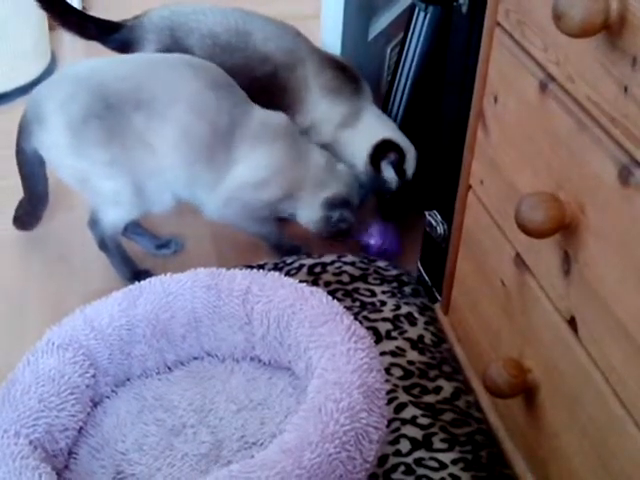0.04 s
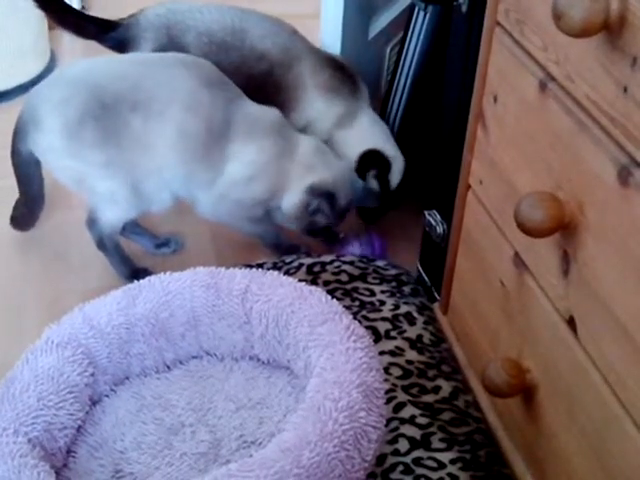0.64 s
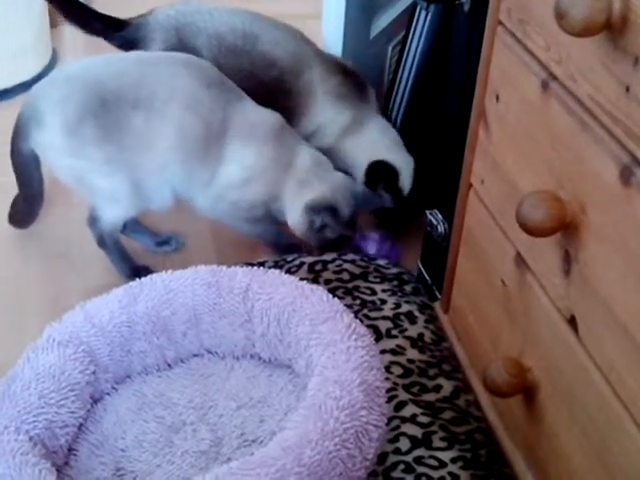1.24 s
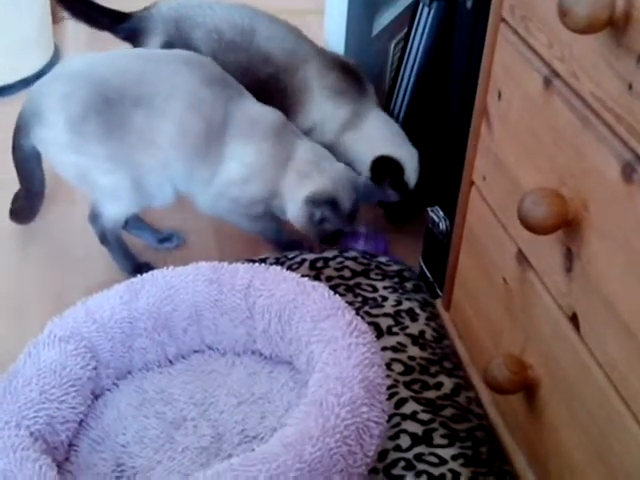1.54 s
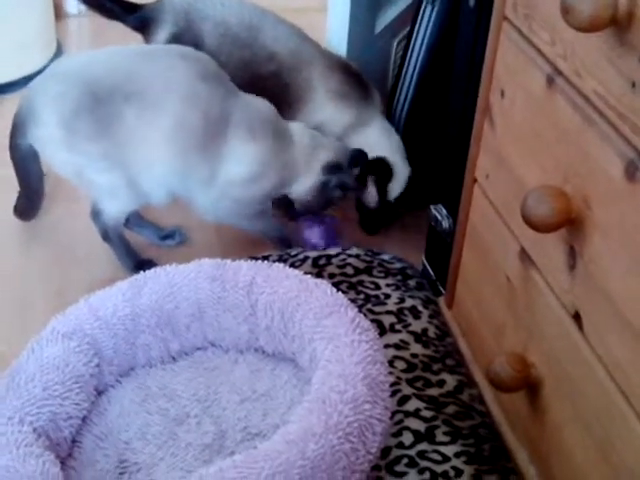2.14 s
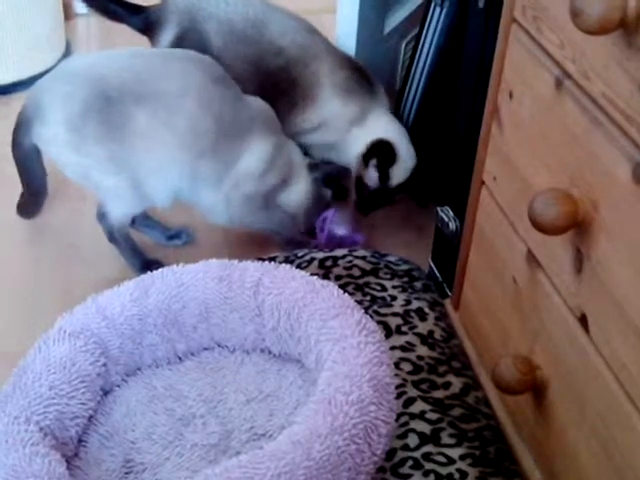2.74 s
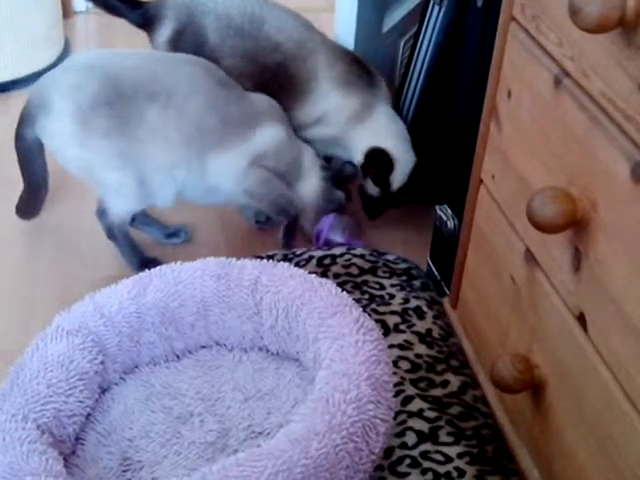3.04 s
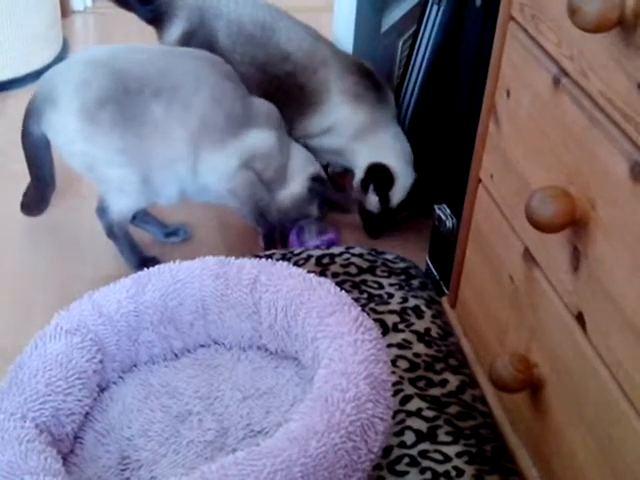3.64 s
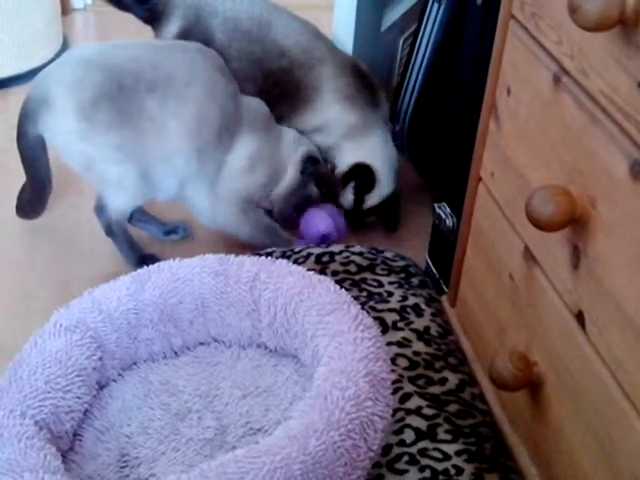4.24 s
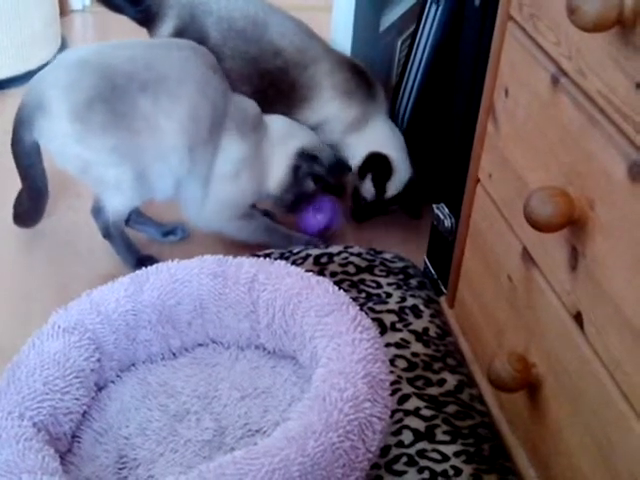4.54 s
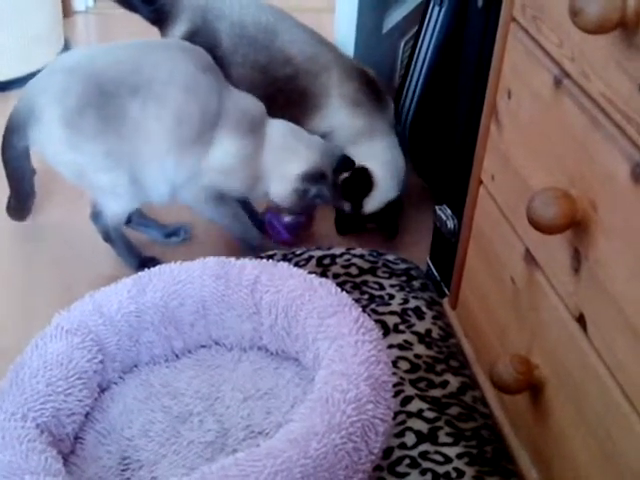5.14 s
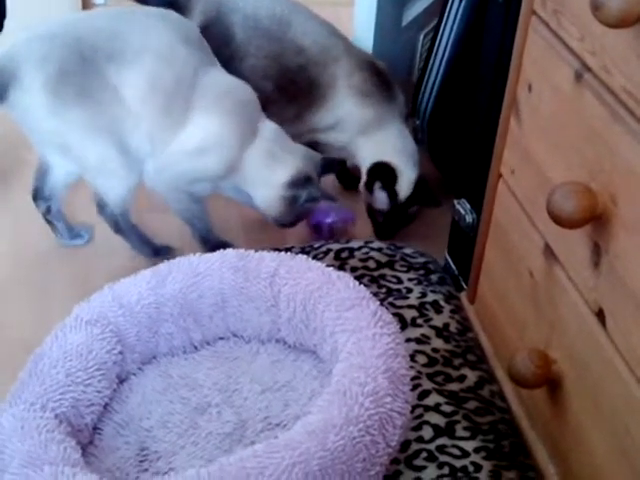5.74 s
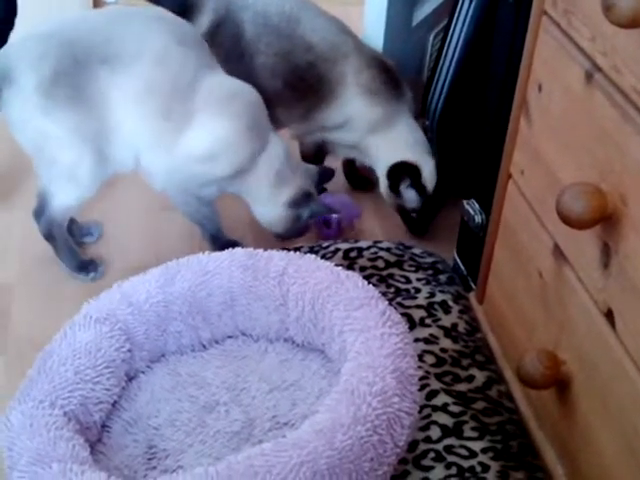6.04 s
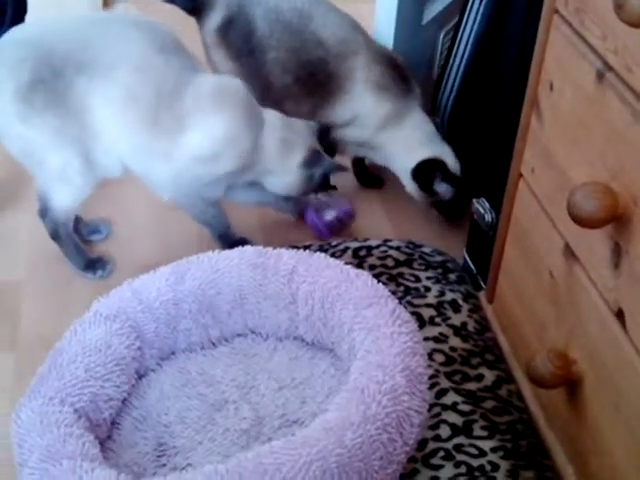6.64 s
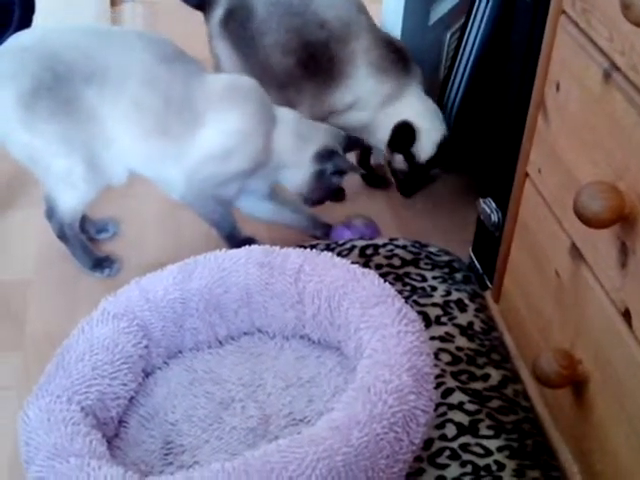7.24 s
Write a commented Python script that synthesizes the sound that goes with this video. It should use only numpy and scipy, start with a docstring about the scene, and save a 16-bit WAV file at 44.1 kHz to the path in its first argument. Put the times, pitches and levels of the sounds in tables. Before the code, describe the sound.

Two cats paw a hollow plastic treat ball over a wooden floor in a small, quiet room. The ball is close and slightly left. From about 0.3 seconds, dry food clicks sharply against the shell and slides inside in short rattles, bunching at 1.5 seconds and again, louder, at 2.3. The ball knocks lightly and rumbles briefly on the boards, with dull thuds near 0.9 and 2 seconds. From 2.5 to 4 seconds there is little but faint high ticks and soft shuffling. Clicks return at 4 seconds and build into a busy rattling cluster between 4.5 and 5.1, with one more clack at 5.5. After another lull, a last flurry runs from 6.8 to 7.5 seconds, with the loudest crack at about 7.2 and a soft bump on the floor. A faint low hum and soft room hush continue throughout.

```python
"""Sharp plastic clicks and a dry rattle in a quiet room: two cats paw a hollow treat ball over a wooden floor.
Dry food snaps against the shell, pings its wall and slides about inside as the ball tips.
The ball knocks as it bumps into things and rumbles on the boards, where paws land with dull thuds.
Faint high ticks, a low hum and the hush of the small furnished room lie underneath."""
import sys
import numpy as np
from scipy import signal
from scipy.fft import rfft, irfft, next_fast_len
from scipy.io import wavfile
from scipy.ndimage import map_coordinates

SR = 44100
rng = np.random.default_rng(int(sys.argv[2]) if len(sys.argv) > 2 else 0)


def waveform_to_disk(signal):
    """Save audio, clipped to [-1, 1], as 16-bit WAV at the path in sys.argv[1]."""
    frames = np.transpose(np.atleast_2d(signal))
    scaled = np.clip(frames, -1, 1) * 32767
    samples = np.round(scaled).astype(np.int16)
    wavfile.write(sys.argv[1], SR, samples)


N = 329868


def amp(db):
    """Decibels to gain."""
    return 10 ** (np.asarray(db) / 20)


def unit(x):
    """Scale to rms 1."""
    return x / np.sqrt(np.mean(x ** 2) + 1e-20)


def at_level(x, db, length):
    """Give x the energy of a sound at db that lasts length seconds."""
    return x * amp(db) * np.sqrt(length * SR / (np.sum(x ** 2) + 1e-20))


def curve(points, hz):
    """Read (Hz, value) breakpoints on a log frequency axis."""
    freqs, values = np.transpose(points)
    return np.interp(np.log(hz + 1), np.log(freqs), values)


def wobble(rate):
    """Smooth random modulation, rate knots a second."""
    return map_coordinates(rng.standard_normal(int(N * rate / SR) + 4), [np.arange(N) * rate / SR])


def filtered(x, response):
    """EQ x with the gain response(Hz)."""
    n = x.shape[-1]
    size = next_fast_len(n + SR // 4)
    return irfft(rfft(x, size) * response(np.fft.rfftfreq(size, 1 / SR)), size)[..., :n]


def impulse(eq_db, size=1024):
    """A minimum-phase transient with the spectrum eq_db(Hz)."""
    cepstrum = irfft(np.log(amp(eq_db(np.fft.rfftfreq(size, 1 / SR)))))
    cepstrum[1:size // 2] *= 2
    cepstrum[size // 2 + 1:] = 0
    return irfft(np.exp(rfft(cepstrum)))


def patter(length, rate, scatter_db, count=96):
    """Up to count irregular contacts within length seconds, about rate a second."""
    gaps = rng.uniform(.3, 1.7, count)
    hits = amp(scatter_db * rng.standard_normal(count)) * rng.choice([-1, 1], count)
    times = (np.cumsum(gaps) - gaps[0]) / rate
    inside = times <= length
    return np.bincount((times[inside] * SR).astype(int), hits[inside])


def add(out, start, x):
    """Mix stereo x into out at start seconds."""
    i = max(round(start * SR), 0)
    out[:, i:i + x.shape[1]] += x[:, :max(N - i, 0)]


def pan(db):
    """Stereo gains of mean power 1, the left db above the right."""
    return unit(amp([[db / 2], [-db / 2]]))


def in_room(x, pan_db, wet_db, wet_pan_db, mono_share=0, t60=0.25):
    """The direct sound plus a short tail of reflections that arrive in uneven clumps."""
    t = np.arange(SR // 4) / SR
    knots = np.arange(300) / 1000
    clumps = amp(3.7 * np.array([np.interp(t, knots, rng.standard_normal(300)) for _ in range(3)]))
    noise = rng.standard_normal((3, len(t))) * clumps * amp(-60 * t / t60) * (1 - np.exp(-t / 0.0013))
    tail = np.sqrt(1 - mono_share) * noise[:2] + np.sqrt(mono_share) * noise[2]
    wet = signal.fftconvolve(x[None], tail, axes=1)
    wet *= np.sqrt(np.sum(x ** 2) / np.sum(wet ** 2, axis=1, keepdims=True))
    out = wet * amp(wet_db) * pan(wet_pan_db)
    direct = np.array([np.pad(x, (2, 0)), np.pad(x, (0, 2))])  # a little later on the left
    out[:, :len(x) + 2] += pan(pan_db) * direct
    return out


# Tone colour of the room's air: (frequency [Hz], relative level [dB])
AIR_EQ = [(25, -12), (60, -17), (100, -8.5), (130, 1), (165, -4), (210, 0), (290, -6.5), (410, -5.5),
          (800, -9.5), (1500, -13), (3000, -17.5), (5000, -15.5), (6800, -11.5), (7500, -18.5),
          (8400, -29.5), (9200, -68.5)]
# Stereo image of the air: (frequency [Hz], left-right correlation [0-1])
AIR_CORRELATION = [(60, 0.52), (120, 0.71), (240, 0.66), (490, 0.53), (980, 0), (2000, 0)]

def room_air():
    """A soft noise bed, fairly centred in the bass, wide and leaning left in the treble."""
    def mid_side_eq(hz):
        width = np.arccos(curve(AIR_CORRELATION, hz)) / 2
        return amp(curve(AIR_EQ, hz)) * [np.cos(width), np.sin(width)]

    mid, side = filtered(rng.standard_normal((2, N)), mid_side_eq)
    lean = lambda hz: amp(curve([(2500, 0.18), (7000, 4.1)], hz) * np.array([[1], [-1]]))
    air = filtered(np.array([mid + side, mid - side]), lean)
    return amp(-64 + 0.12 * wobble(14)) * unit(air)


# Partials of the hum: (frequency [Hz], relative level [dB], phase wander [rad])
HUM_PARTIALS = [(133.3, -70.5, 0.47), (219.8, -74, 1.56), (406, -80, 1.2)]

def hum():
    """Three low sines that waver in level and phase."""
    t, out = np.arange(N) / SR, np.zeros(N)
    for hz, db, wander in HUM_PARTIALS:
        rms = amp(db - 2.5 + 0.69 * wobble(3.7))
        out += rms * np.sqrt(2) * np.sin(2 * np.pi * hz * t + wander * wobble(12))
    return out


# Fader moves of a thin distant tone: (time [s], level [dB])
TONE_FADER = [(4.1, -90), (4.45, -85), (4.8, -76), (5.03, -98), (5.18, -73), (5.5, -72.5), (5.75, -87),
              (6.1, -78.5), (6.5, -81), (6.9, -88)]

def distant_tone(pitch_hz=914.7, width_hz=13):
    """A narrow band of noise that comes and goes."""
    band = filtered(rng.standard_normal(N), lambda hz: 1 / (1 + ((hz - pitch_hz) / width_hz) ** 2))
    return amp(np.interp(np.arange(N) / SR, *np.transpose(TONE_FADER))) * unit(band)


# Tone colour of a tick: (frequency [Hz], relative level [dB])
TICK_EQ = [(2000, -28.5), (5600, -20.5), (6500, -2.5), (6900, 4.5), (7300, -14), (7900, -38.5), (9000, -42)]
# The clearest ticks: (time [s], relative level [dB])
TICK_CUES = [(.043, -50.5), (.112, -45.5), (.239, -40), (.774, -45.5), (.845, -49), (.929, -42),
             (.9587, -38), (1.049, -40), (1.152, -47), (1.179, -48.5), (1.329, -54), (1.93, -49.5),
             (2.142, -48.5), (2.528, -49), (2.569, -47), (2.779, -47.5), (2.844, -47.5), (2.929, -46.5),
             (2.9885, -45), (3.229, -47), (3.3442, -45), (3.562, -43), (3.871, -49), (3.91, -49.5),
             (4.308, -48), (4.38, -45), (5.619, -47), (5.771, -46.5), (5.908, -49.5), (5.979, -48.5),
             (6.539, -45.5), (6.578, -45.5), (6.629, -45), (6.694, -47)]

def ticks():
    """Tiny thin ticks on the left, where the cats nose about: clear ones and fainter ones at random."""
    out = np.zeros((2, N))
    tick = impulse(lambda hz: curve(TICK_EQ, hz))
    faint = [(when * N / SR, -56.5 + 4 * size) for when, size in rng.random((24, 2))]
    for start, db in [*TICK_CUES, *faint]:
        hit = at_level(tick, db - 6, 0.0025)
        add(out, start, in_room(hit, pan_db=32, wet_db=-3.5, wet_pan_db=17.5))
    return out


# Resonances of the floorboards: (frequency [Hz], bandwidth [Hz], relative level [dB])
BOARD_MODES = [(132, 24, -16.5), (199.4, 37.7, 2), (297.3, 22, -0.5), (377, 61, -7.5), (441, 12, -1),
               (528.8, 20, 5), (600, 23, 1), (655, 32, -5), (753, 70, -11), (855, 82, -15),
               (1070, 103, -17), (1323, 120, -19), (1850, 340, -35.5)]
BOARD_PREROLL_S = 0.01

def boards(force, bass_db, hard_db):
    """A force rings the wooden floor, after a pre-roll; bass adds weight, hardness lifts 900 Hz."""
    f = np.fft.rfftfreq(SR // 2, 1 / SR)
    modes = sum((-1) ** k * amp(db) * 1j * f * width / (hz * hz - f * f + 1j * f * width)
                for k, (hz, width, db) in enumerate(BOARD_MODES))
    eq = [(50, -20.5), (130, bass_db), (220, bass_db), (450, 2.5), (590, 1), (900, hard_db),
          (1800, -6), (2600, -5.5), (5000, -29.5)]
    padded = np.pad(force, (round(BOARD_PREROLL_S * SR), 0))
    return irfft(rfft(padded, SR // 2) * modes * amp(curve(eq, f)))


# Dull thuds on the floor: (time [s], relative level [dB], bass [dB], hardness [dB])
THUD_CUES = [(.893, -47.5, -3, 10), (1.57, -72, 1, 8), (1.648, -61, 6, -7), (1.967, -45.5, -10, 7.5),
             (2.024, -45.5, -3, 0.5), (2.421, -55, 7.5, -20), (5.011, -68, 33, -5), (6.205, -67, 17, -10),
             (7.273, -48.5, -9, 6), (7.298, -54, 4, 0)]

def thuds():
    """The ball or a paw rings the boards once: a few clear thuds and soft shuffling at random."""
    out = np.zeros((2, N))
    shuffles = [(when * N / SR, -71.5 + 7 * size, 6 * bass, 5 * hard)
                for when, size, bass, hard in rng.random((26, 4))]
    for start, db, bass_db, hard_db in [*THUD_CUES, *shuffles]:
        thud = at_level(boards(np.ones(1), bass_db, hard_db), db - 3.5, 0.03)
        heard = in_room(thud, pan_db=-5.5, wet_db=-2.5, wet_pan_db=2.5, mono_share=0.3)
        add(out, start - BOARD_PREROLL_S, heard)
    return out


# Nudges of the ball: (time [s], push length [s], level [dB], bass [dB], hardness [dB])
ROLL_CUES = [(0.03, 0.071, -66.5, 22, 0), (0.312, 0.021, -56.5, -3.5, -12.5), (0.501, 0.075, -61.5, 8, 4),
             (0.567, 0.039, -47, 1.5, 3), (0.895, 0.029, -39, -5.5, 2.5), (1.968, 0.043, -42, -2, 3.5),
             (2.075, 0.036, -55, 4, 7.5), (2.159, 0.013, -59.5, 5, -1), (2.36, 0.015, -61.5, -6, -17),
             (4.391, 0.041, -62, 0, 7), (7.222, 0.022, -58, -7, 13), (7.278, 0.024, -56, -8, 17)]

def ball_rolls(attack_s=0.0045, t60=0.15):
    """The ball's seams and ridges bump along the boards: a push, then it rocks to rest."""
    out = np.zeros((2, N))
    for start, length, db, bass_db, hard_db in ROLL_CUES:
        bumps = patter(length + t60 / 2, rate=300, scatter_db=4.5)
        t = np.arange(len(bumps)) / SR
        attack = np.minimum((t + 0.0063) / attack_s, 1)
        release = amp((t > length) * (0.5 - 60 * (t - length) / t60))
        rumble = at_level(boards(bumps * attack * release, bass_db, hard_db), db, length)
        heard = in_room(rumble, pan_db=-2.5, wet_db=-5.5, wet_pan_db=-0.3, mono_share=0.34)
        add(out, start - BOARD_PREROLL_S, heard)
    return out


def ping(hz, t60):
    """One damped resonance of the plastic, with a slightly rounded attack."""
    t = np.arange(1024) / SR
    attack = (1 - np.exp(-t / min(0.39 * t60, 0.00092))) ** 2
    return np.sin(2 * np.pi * hz * t) * attack * amp(-60 * t / t60)


# Resonances of the ball's wall: (frequency [Hz], relative level [dB])
WALL_MODES = [(600, -10.5), (980, -5.5), (1200, -13), (1850, -5.5), (2120, -16), (2420, -1.5), (2720, -6),
              (3330, 12.5), (3750, -6.5), (4260, 13), (4620, 7.5), (5000, 10)]

def wall(favoured_hz, focus_db_per_octave, t60):
    """The wall's modes ring together; those far from the favoured pitch ring less."""
    out = 0
    for k, (hz, db) in enumerate(WALL_MODES):
        gain = amp(db - focus_db_per_octave * abs(np.log2(hz / favoured_hz)) + rng.normal(0, 5.6))
        detune = 1 + 0.02 * rng.standard_normal()  # each ping rings at a slightly different pitch
        out += (-1) ** k * gain * ping(hz * detune, t60)
    return out


# Hollow knocks of the ball, and a broadband splat like overload on the loudest crack:
# (time [s], level [dB], favoured pitch [Hz], focus [dB/octave])
KNOCK_CUES = [(1.46, -53.5, 2640, 40), (1.567, -38.5, 1200, 12), (1.57, -54, 1220, -5),
              (1.604, -54, 1900, 27), (1.61, -54, 2760, 93), (2.348, -45, 2460, 49), (2.396, -49, 2950, 35),
              (4.507, -62, 2540, 47), (4.538, -60, 2530, 50), (4.835, -51, 1140, 20.5),
              (4.875, -49.5, 2440, 63), (4.88, -54, 1140, 34), (4.915, -45.5, 1580, 14),
              (4.929, -51, 2380, 70), (4.948, -62, 2170, 24), (4.988, -69, 2390, 65), (5.55, -61, 2500, 62),
              (6.779, -51, 2870, 42), (6.9863, -51, 2770, 89), (7.185, -40.5, 1500, 5),
              (7.365, -53.5, 1270, 47), (7.384, -43, 2470, 54), (7.442, -54, 2420, 68)]

def ball_knocks():
    """The wall flexes as a whole in a bump; the broad hit at 7.185 s imitates an overload splat instead."""
    out = np.zeros((2, N))
    for start, db, favoured_hz, focus in KNOCK_CUES:
        knock = at_level(wall(favoured_hz, focus, t60=0.027), db, 0.00062)
        add(out, start, in_room(knock, pan_db=-3, wet_db=0.5, wet_pan_db=-7, mono_share=0.48))
    return out


# Tone colour of a blow on the shell: (frequency [Hz], relative level [dB])
SHELL_EQ = [(200, -51.5), (1900, -65), (2600, -44.5), (3300, -30), (4200, -16.5), (5200, -3), (6200, 4),
            (6900, 5.5), (7350, -5), (7900, -39), (8300, -41), (8750, -23), (9300, -52)]
# Where a blunt blow adds body: (frequency [Hz], share of the boost [0-1])
BODY_SHARE = [(4800, 0.84), (6400, 0.56)]

def shell_snap(uneven_db, snap_hz, body_db):
    """The shell's bright snap, led by one resonance; each struck spot colours it differently."""
    spot_eq = np.transpose([np.linspace(2000, 9000, 36), uneven_db * rng.standard_normal(36)])

    def eq_db(hz):
        peak_db = 3.5 / (1 + ((hz - snap_hz) / 190) ** 2)
        return curve(SHELL_EQ, hz) + curve(spot_eq, hz) + peak_db + body_db * curve(BODY_SHARE, hz)

    return impulse(eq_db)


def tumble(length, favoured_hz, ring_db, swell_db=2):
    """One piece's swelling run of small contacts with the shell."""
    snap = shell_snap(uneven_db=2.5, snap_hz=rng.uniform(5500, 7000), body_db=0.5)
    ring = wall(favoured_hz * rng.uniform(0.72, 1.56), focus_db_per_octave=22.5, t60=0.0044)
    grain = unit(snap) + amp(ring_db) * unit(ring)
    contacts = patter(length, rate=80, scatter_db=5.5, count=64)
    contacts = np.pad(contacts, (0, int(length * SR) + 1 - len(contacts)))
    contacts = np.roll(contacts, rng.integers(SR))  # so the pieces do not all start together
    swell = amp(swell_db * np.linspace(-1, 0, len(contacts)))
    return signal.fftconvolve(contacts * swell, grain)


# Food sliding as the ball tips:
# (time [s], length [s], relative level [dB], favoured wall pitch [Hz], wall ring [dB])
SLIDE_CUES = [(0.415, 0.077, -60, 4700, 2), (0.568, .1, -49.5, 4700, -10.5),
              (0.887, 0.056, -50.5, 4970, -27), (1.422, 0.063, -51, 4380, 0),
              (1.577, 0.069, -54.5, 3300, 5), (1.952, 0.072, -60, 4500, -11), (2.25, 0.095, -45, 4200, -16),
              (2.493, 0.018, -58.5, 4360, 4), (4.395, .12, -59.5, 4360, -15), (4.541, 0.1, -53, 4500, -5),
              (4.714, .06, -51, 4400, -12), (4.845, 0.12, -51, 2340, -14), (4.988, 0.14, -50, 4040, -30),
              (7.032, 0.15, -48, 4550, -28), (7.198, 0.089, -43, 4540, -16.5), (7.292, 0.14, -44, 3650, -8)]

def food_slides(pieces=8):
    """Loose pieces tumble along the inside of the shell, harder as the ball tips further."""
    out = np.zeros((2, N))
    for start, length, db, favoured_hz, ring_db in SLIDE_CUES:
        grains = sum(tumble(length, favoured_hz, ring_db) for _ in range(pieces))
        rattle = at_level(grains, db - 10.5, length)
        add(out, start, in_room(rattle, pan_db=4.5, wet_db=5, wet_pan_db=4))
    return out


# Food striking the shell: (time [s], relative level [dB], snap pitch [Hz], body [dB],
# favoured wall pitch [Hz], wall ring [dB], ring t60 [s], chatter [dB]); short rings clack, long ones ping
CLICK_CUES = [(.2612, -31, 6360, -1, 4850, -15.5, 0.0082, -3.5),
              (.6695, -24, 7200, -0.5, 4400, -18.5, .005, -5),
              (1.0251, -37, 7040, -25, 4370, -4.5, 0.0079, -12),
              (1.2087, -22, 7100, -5, 4370, -11.5, 0.014, -12), (1.461, -32, 6800, -6, 4730, -4, .007, -13),
              (1.4636, -31, 6740, -9, 4540, -7, .006, -6.5),
              (1.5663, -41.5, 6900, 3, 3400, -9, 0.0054, -16),
              (1.5692, -24.5, 7000, 2, 4200, -13, 0.0064, -5),
              (1.5785, -37.5, 6500, 2, 3440, -22, .005, -17),
              (1.6083, -27.5, 6300, 19, 3640, -18, 0.0064, -7.5),
              (1.6173, -29, 6100, 6, 3750, -26, .005, -19), (1.632, -38.5, 6130, 10, 3750, -9, 0.0044, -17),
              (2.246, -39, 6540, -5, 3620, -25, 0.0034, -5), (2.309, -40, 6500, 9, 4220, -19, 0.0043, 3.5),
              (2.3347, -14, 6350, 2, 4150, -24, 0.0078, -26), (2.338, -26.5, 6400, 0, 4170, -20, .005, -20),
              (2.343, -23.5, 6100, 14, 3800, -17, 0.0057, -5.5),
              (2.3608, -31.5, 6150, 9, 4660, -6, .005, -3), (2.373, -37, 6300, 10, 4070, -9, .005, -3.5),
              (2.3955, -34, 6200, 15, 4230, -19, 0.0081, -6),
              (4.0095, -33, 6300, -2, 3440, -22.5, 0.008, -4.5),
              (4.015, -30, 6600, 0, 4000, -19, 0.0035, -14),
              (4.0333, -21, 5960, 15, 5140, -8.5, 0.0065, -19),
              (4.054, -34, 5960, 15, 5030, -21, 0.0054, 3), (4.5065, -34.5, 6540, -6, 4100, -22, 0.0029, 1),
              (4.5389, -35, 6500, 10, 4500, -12.5, 0.0021, -2),
              (4.724, -48, 6600, -9, 4400, -19, .006, -0.5), (4.8352, -20, 7100, -1, 3300, -33, 0.0054, -7),
              (4.877, -28, 6540, 13, 4440, -20, 0.0067, -6),
              (4.9005, -37.5, 6300, 7.5, 4020, -11, .005, -5),
              (4.9134, -32.5, 6500, 3, 4560, -4.5, 0.0077, -7),
              (4.9465, -21, 6800, -7, 3320, -26, 0.0062, -8),
              (4.9487, -25, 6500, -1, 3570, -18, 0.0035, -6), (4.955, -39.5, 6200, 13, 3400, -8, .005, -6),
              (4.988, -33.5, 6330, 16, 3530, -25, 0.0069, -5),
              (5.0108, -18.5, 6460, -3, 4200, -20.5, 0.005, -19.5),
              (5.083, -39, 6000, 10, 3400, -12, 0.0069, -6), (5.091, -15.5, 7250, -5, 3480, -33, 0.012, -9),
              (5.11, -31.5, 6530, -17, 3450, -39, 0.0074, 4.5),
              (5.5179, -28.5, 6100, 17, 4920, -10.5, 0.0035, -4),
              (5.526, -29.5, 6100, 21, 4150, -6.5, 0.0057, -6),
              (6.7789, -34, 7200, 0, 4850, -6.5, 0.0034, -5.5),
              (6.8982, -48, 7000, 0.5, 4430, -11, .006, -7),
              (6.9852, -17.5, 6850, 2, 4640, -6.5, 0.0031, -20),
              (7.005, -30, 6600, -8, 4200, -15, .004, -4), (7.1868, -6.5, 6320, -18, 4950, -45, .005, -22),
              (7.344, -41.5, 6400, 9, 4200, -12, 0.0049, 3.5),
              (7.3628, -24, 6360, 8, 3370, -18, 0.0026, -3),
              (7.3828, -18.5, 6100, 13, 3770, -18.5, 0.0061, -4),
              (7.3895, -21, 6100, 7, 3770, -23, .004, -13), (7.411, -28.5, 6130, 6, 3170, -22, 0.0046, -5),
              (7.436, -32, 6300, 11, 4200, -18, .005, -4)]

def food_clicks(snap_pan_db=11.5, echo_s=0.0046):
    """A hard piece grazes the shell, hits it and chatters on it; the wall pings along with the snap."""
    out = np.zeros((2, N))
    average_db = np.mean(CLICK_CUES, axis=0)[1]
    for start, db, snap_hz, body_db, favoured_hz, ring_db, ring_t60, chatter_db in CLICK_CUES:
        snap = at_level(shell_snap(uneven_db=1.8, snap_hz=snap_hz, body_db=body_db), db - 3, 0.0022)
        ring = wall(favoured_hz, focus_db_per_octave=58, t60=ring_t60)
        ring = at_level(ring, db + ring_db - 5, 0.0043)
        wet_db = -4 - 0.12 * (db - average_db)  # the hardest snaps are the driest
        add(out, start, in_room(snap, snap_pan_db, wet_db, wet_pan_db=10))
        add(out, start, in_room(ring, pan_db=-1, wet_db=-8.5, wet_pan_db=3))

        graze = pan(snap_pan_db) * amp(-30) * snap
        add(out, start - rng.uniform(0.00063, 0.0027), graze)

        chatter = signal.fftconvolve(patter(0.011, rate=1000, scatter_db=0), snap + amp(4) * ring)
        chatter *= amp(-60 * np.arange(len(chatter)) / SR / 0.024)
        chatter = at_level(chatter, db + chatter_db, 0.0014)
        add(out, start + 0.001, in_room(chatter, pan_db=0.5, wet_db=5, wet_pan_db=6))

        echo = pan(snap_pan_db) * amp(-22.5) * (snap + ring)  # thrown back by nearby furniture
        add(out, start + echo_s * rng.uniform(0.97, 1.05), echo)
    return out


def scene():
    """The treat ball up front, then the ticks and the floor, over the room tone."""
    ball = food_clicks() + ball_knocks() + food_slides()
    return ball + ticks() + ball_rolls() + thuds() + room_air() + hum() + distant_tone()


def record(dry, top_hz=9600):
    """Hard clipping at full scale, then a steep low-pass."""
    return filtered(np.clip(dry, -1, 1), lambda hz: 1 / np.sqrt(1 + (hz / top_hz) ** 60))


dry = scene()
out = record(dry)
waveform_to_disk(out)
```